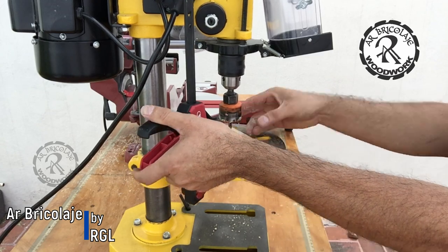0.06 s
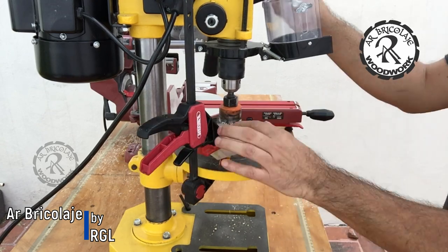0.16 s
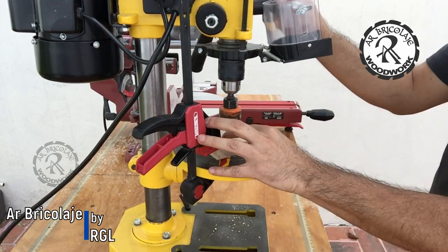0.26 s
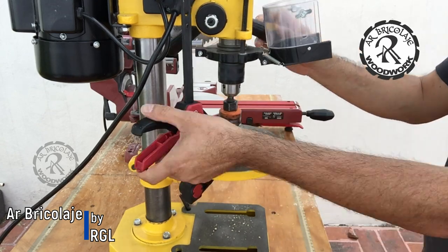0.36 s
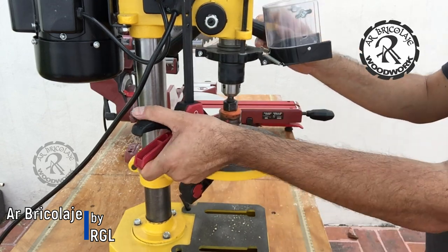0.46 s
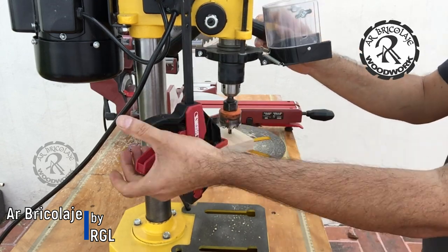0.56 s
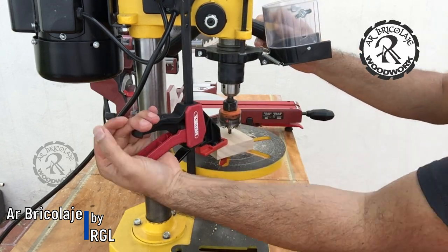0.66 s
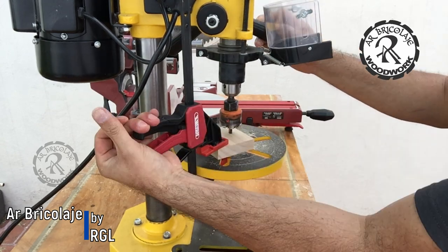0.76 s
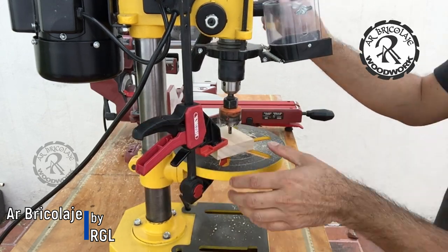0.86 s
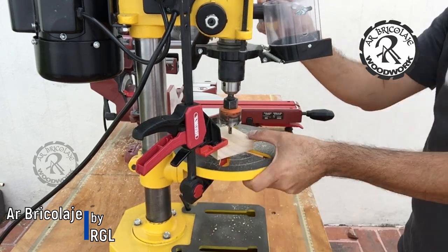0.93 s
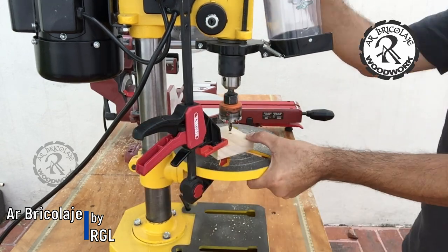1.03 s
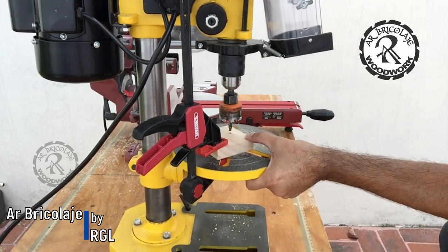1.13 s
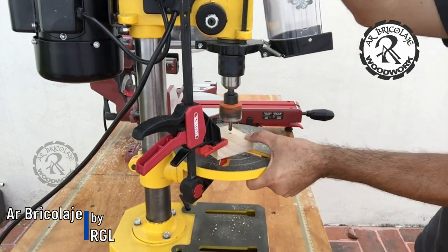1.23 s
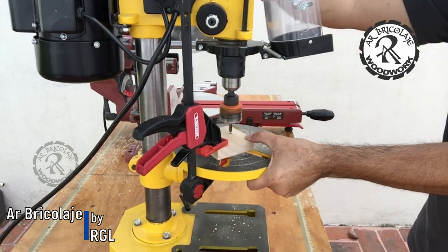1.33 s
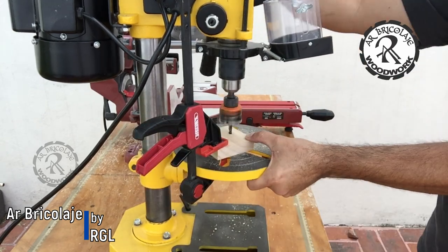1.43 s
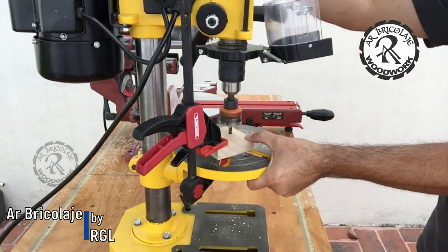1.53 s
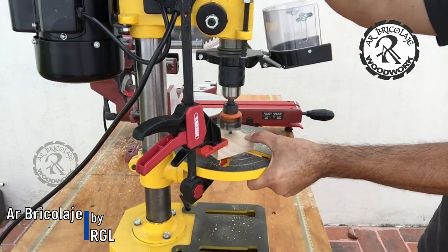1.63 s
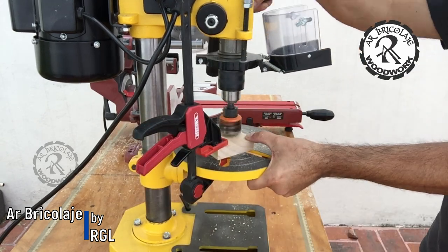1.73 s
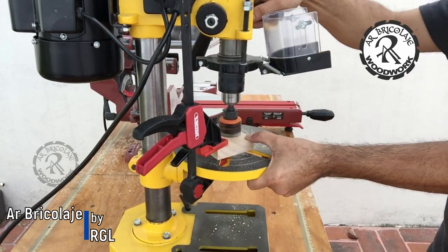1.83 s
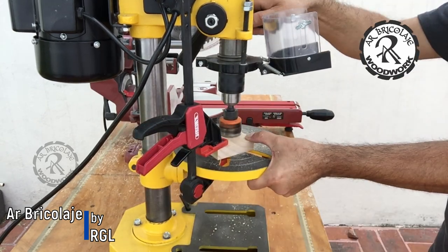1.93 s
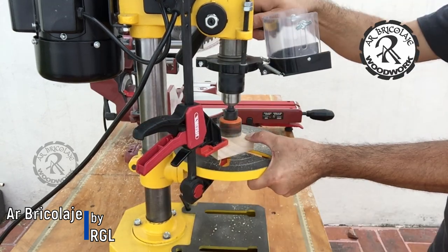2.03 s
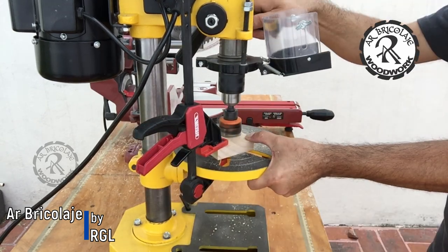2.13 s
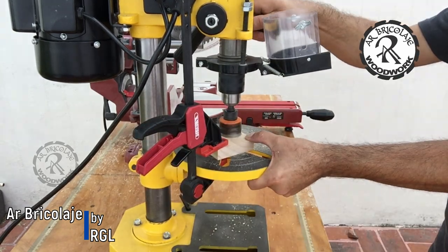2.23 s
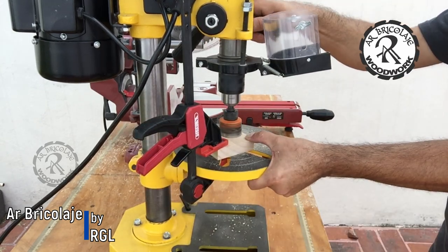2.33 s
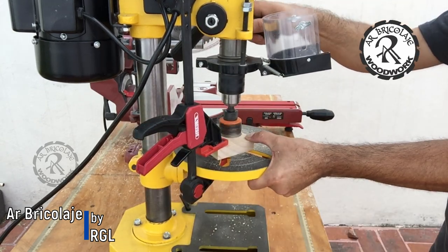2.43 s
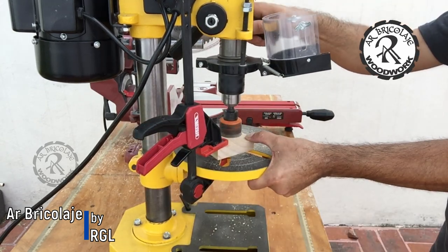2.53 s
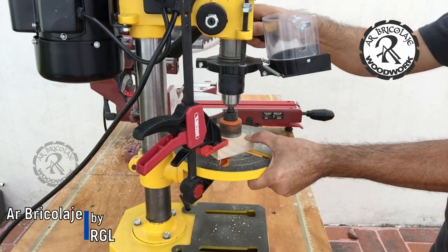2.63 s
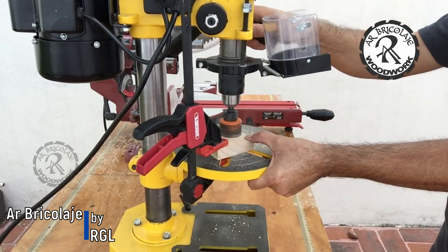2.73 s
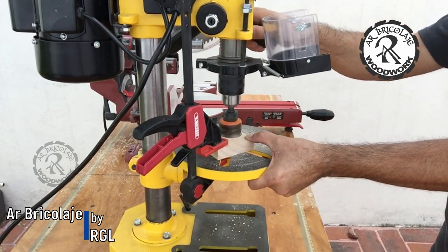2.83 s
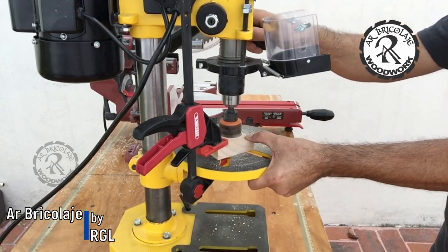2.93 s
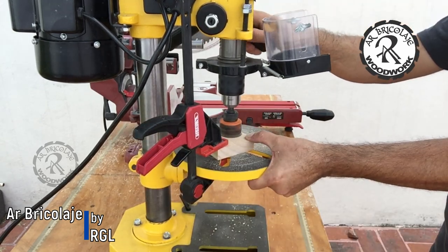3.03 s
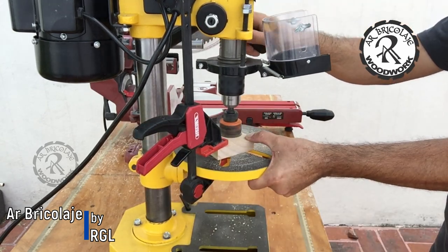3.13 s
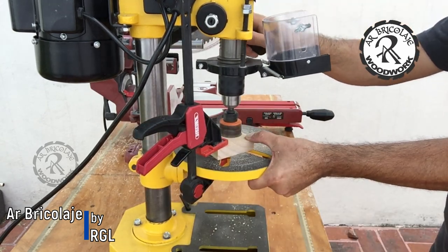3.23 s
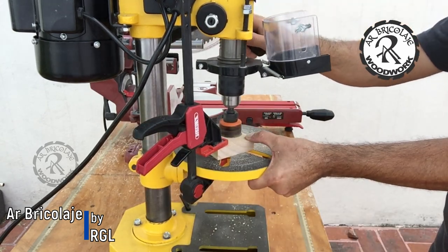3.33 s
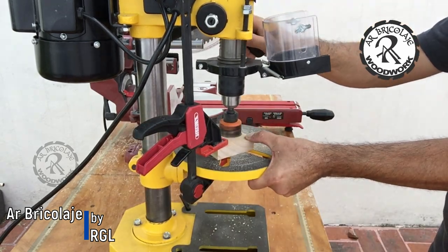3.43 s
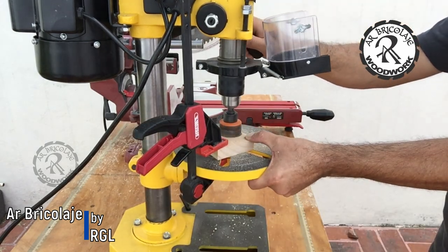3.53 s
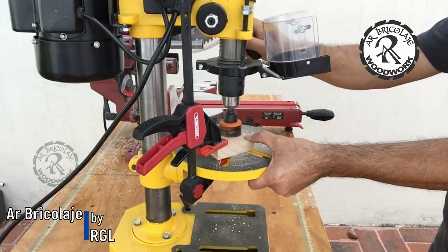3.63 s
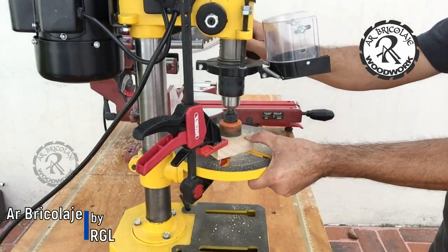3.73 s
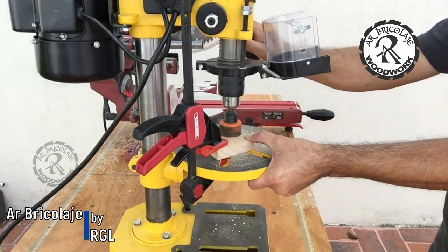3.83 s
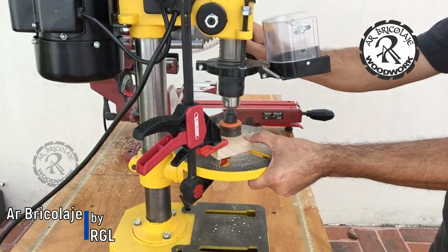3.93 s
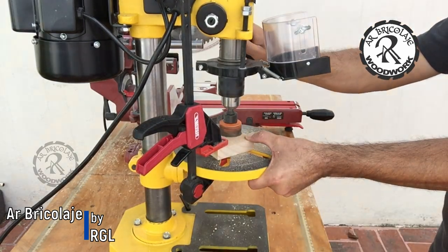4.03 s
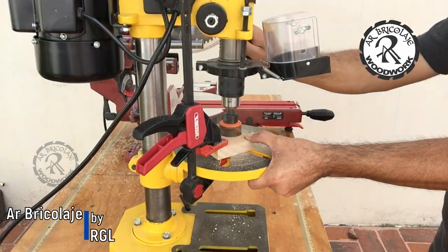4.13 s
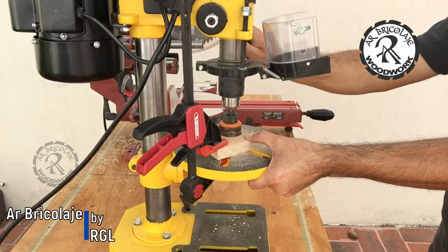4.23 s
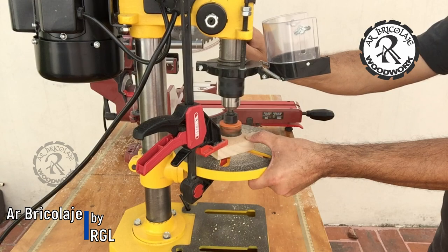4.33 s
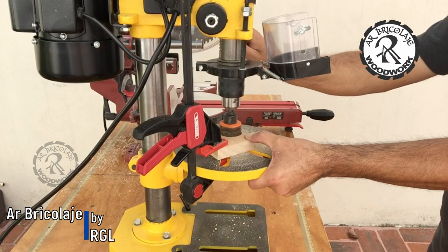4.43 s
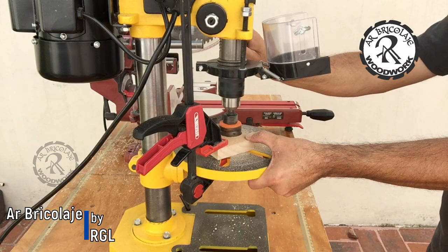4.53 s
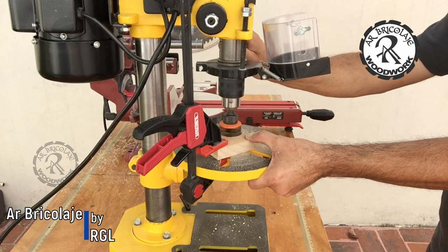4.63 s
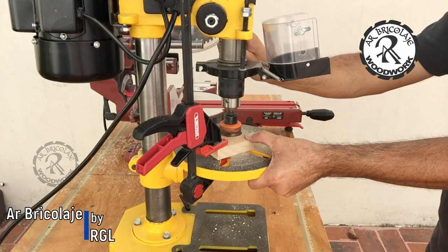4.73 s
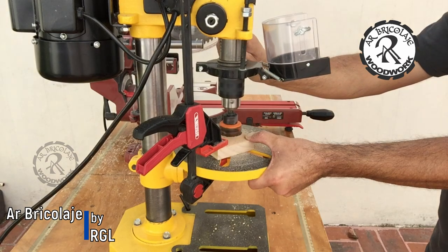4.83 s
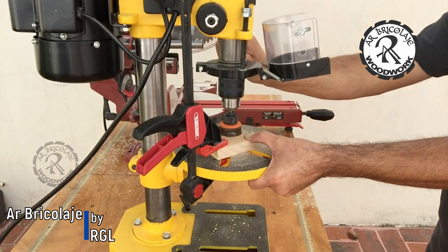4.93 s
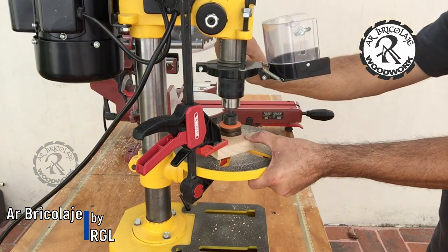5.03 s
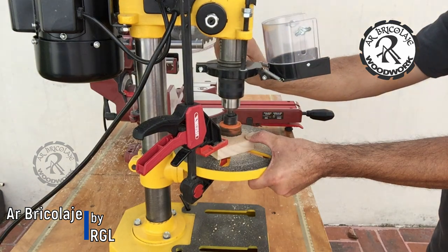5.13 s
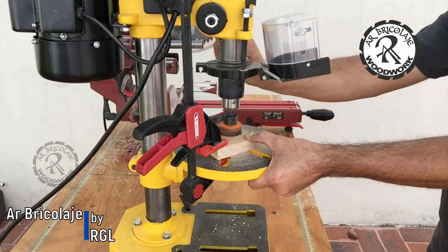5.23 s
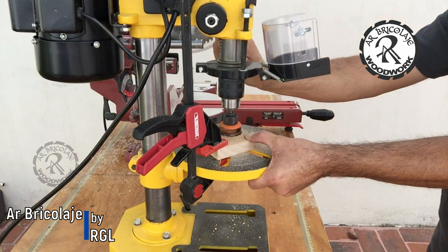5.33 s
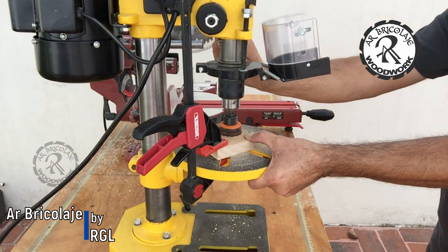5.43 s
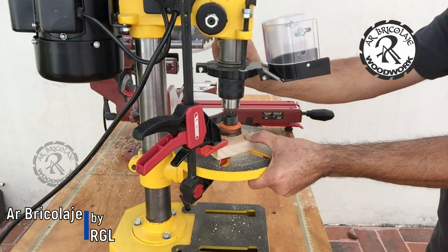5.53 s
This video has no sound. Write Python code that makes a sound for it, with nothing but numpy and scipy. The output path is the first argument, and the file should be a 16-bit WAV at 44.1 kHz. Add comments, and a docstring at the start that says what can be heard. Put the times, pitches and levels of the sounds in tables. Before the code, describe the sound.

A bench drill press whirs free with small clicks and squeaks, then its hole saw rasps into wood and settles into singing, grinding friction.

```python
"""A motor idles with a fan rush and a whine: a bench drill press, fast and high-pitched; clicks and faint squeaks.
Its hole saw then bites a clamped wooden block with a rough rasp, sinks into the kerf, slows, rubs and sings.
Rush, rasp and dust are shaped noise; friction rereads a wearing circular track, so it nearly repeats each turn.
Whine and singing are unsteady sines locked to the spindle angle; clicks are sums of decaying modes."""
import sys
import numpy as np
from scipy import signal
from scipy.fft import rfft, irfft, next_fast_len
from scipy.io import wavfile
from scipy.ndimage import uniform_filter1d, map_coordinates

SR = 44100
rng = np.random.default_rng(int(sys.argv[2]) if len(sys.argv) > 2 else 0)


def generate_wav(signal):
    """Clip the signal to [-1, 1] and save it as 16-bit WAV at the path in sys.argv[1]."""
    frames = np.transpose(np.atleast_2d(signal))
    scaled = np.clip(frames, -1, 1) * 32767
    pcm = np.round(scaled).astype(np.int16)
    wavfile.write(sys.argv[1], SR, pcm)


N = 246078

# Partials on which the cup sings. Each entry: multiple of the spindle speed.
SINGING_MULTIPLES = (7, 8, 12, 13, 14, 15, 16, 17, 18, 19, 20, 23, 24)


def amp(db):
    """Level law: decibels to amplitude gain."""
    return 10 ** (np.asarray(db) / 20)


def unit(x):
    """Power normalisation: scale to rms 1."""
    return x / np.sqrt(np.mean(x ** 2) + 1e-20)


def curves(rows):
    """Linear interpolation: one value per sample for each column after the time."""
    s, *columns = np.transpose(rows)
    return [np.interp(np.arange(N) / SR, s, column) for column in columns]


def ramp(start, length):
    """Linear onset: rises from 0 to 1 over length seconds."""
    return np.clip((np.arange(N) / SR - start) / length, 0, 1)


def swell(centre, length):
    """Gaussian envelope of height 1, down to exp(-2) at length seconds either side of its centre."""
    return np.exp(-2 * ((np.arange(N) / SR - centre) / length) ** 2)


def wobble(rate):
    """Slow random modulation: a smooth curve through random knots, rate of them a second."""
    coarse = np.linspace(0, N, 4096)
    knots = rng.standard_normal(int(N * rate / SR) + 4)
    smooth = map_coordinates(knots, [coarse * rate / SR])
    return np.interp(np.arange(N), coarse, smooth)


def noise():
    """White noise: equal power at every frequency."""
    return rng.standard_normal(N)


def filtered(x, response):
    """Linear filtering: the spectrum of x times a response of frequency."""
    m = next_fast_len(N + SR // 4)
    spectrum = rfft(x, m) * response(np.fft.rfftfreq(m, 1 / SR))
    return irfft(spectrum, m)[..., :N]


def coloured(x, spectrum):
    """Spectral shaping: x through a (Hz, relative dB) curve over log frequency, at rms 1."""
    f, db = np.transpose(spectrum)
    return unit(filtered(x, lambda hz: amp(np.interp(np.log(hz + 1), np.log(f), db))))


def partial(turns, order, flutter_db, drift, rate):
    """Order-locked tone of rms 1 at a multiple of rotation; drift is its phase wander in radians."""
    phase = 2 * np.pi * (order * turns + rng.random()) + drift * wobble(rate)
    return unit(amp(flutter_db * wobble(rate)) * np.sin(phase))


def groove(turns, memory, weight=lambda order: 1, size=1024):
    """Quasi-periodic roughness: a circular track met again every turn, worn away over `memory` turns."""
    order = np.arange(96)  # cycles per turn
    fresh = rng.standard_normal((int(turns[-1]) + 2, len(order), 2)) @ [1, 1j]
    keep = np.exp(-1 / memory)
    worn = signal.lfilter([1], [1, -keep], fresh, axis=0)
    track = irfft(worn * weight(order) * (order > 2), size).ravel()
    return unit(np.interp(turns * size, np.arange(len(track)), track))


def scrape(turns, memory, loose, weight=lambda order: 1):
    """Power-sharing mixture: friction on the groove, and a share of loose chips that never repeats."""
    loose = np.clip(loose, 0, 1)
    return np.sqrt(1 - loose) * groove(turns, memory, weight) + np.sqrt(loose) * noise()


def pressure(turns, swing_db, grain_db):
    """Runout modulation: the teeth press unevenly round each turn, and fibres break at random."""
    swing = sum(db * np.cos(2 * np.pi * (k + 1) * turns) for k, db in enumerate(swing_db))
    return unit(amp(swing + grain_db * wobble(330)))


def patchy(x, depth_db):
    """Independent band modulation: narrow bands of x swell and fade, neighbours partly together."""
    z = signal.stft(x, nperseg=512)[2]
    field = rng.standard_normal(z.shape)
    field = uniform_filter1d(field, size=4, axis=0)  # across frequency
    field = uniform_filter1d(field, size=30, axis=1)  # along time
    return unit(signal.istft(z * amp(depth_db * unit(field)), nperseg=512)[1][:N])


def resonance(hz, modes):
    """Resonant gain: powers of several modes added along a pitch curve."""
    grid = np.linspace(hz.min(), hz.max(), 128)
    power = sum(amp(db) ** 2 / (1 + ((grid - centre) / width) ** 2) ** 2 for centre, width, db in modes)
    return np.interp(hz, grid, np.sqrt(power))


def cup(x):
    """Structural resonance: the saw's steel cup lifts the sound around its modes; output at rms 1."""
    # Resonances of the steel cup. Each row: centre in Hz, width in Hz, lift in dB.
    cup_modes = [(2160, 100, 4), (3170, 260, 4), (4020, 57, 3.5), (4770, 130, 7.5), (5760, 320, 3.5),
                 (6470, 93, 6), (9080, 230, 2.5), (12080, 610, 1)]

    def lift(hz):
        return amp(sum(db / (1 + ((hz - centre) / width) ** 2) for centre, width, db in cup_modes))

    return unit(filtered(x, lift))


def lulls():
    """Gated noise: a gain of 1 that dips in brief lulls, for the hiss and not the tones."""
    # Brief lulls. Each row: time in seconds, nominal length in seconds, depth in dB.
    dips = [(.488, .024, 8), (.675, .019, 7), (.721, .017, 7), (.884, .017, 7), (.953, .018, 9),
            (1.162, .023, 9), (1.697, .017, 10), (2.486, .016, 10), (3.159, .017, 12), (3.289, .031, 23),
            (3.529, .018, 10), (4.135, .016, 13), (4.367, .016, 12), (4.436, .015, 9), (4.645, .015, 9),
            (5.387, .018, 12)]
    edge = 0.011 / 2  # s
    # each corner: side of the dip, shift outward in edges; a negative shift marks the floor
    shape = ((-0.84, 1.0), (-1.0, -2.1), (0.045, -2.5), (0.73, 0.81))
    corners = [(s + side * (length / 2 + out * edge), -db * (out < 0))
               for s, length, db in dips for side, out in shape]
    return amp(curves(corners)[0])


def motor(turns):
    """Broadband flow noise and order tones: fan rush, bearing hiss and a rough whine that follows the speed."""
    # Spectrum of the fan rush. Each row: frequency in Hz, relative density in dB per Hz.
    fan_spectrum = [(180, -80), (300, -72.5), (719, -17.5), (1140, -9), (1250, -5.5), (1650, -4.5),
                    (1970, -7), (2120, -3.5), (2370, -5.5), (3500, -16.5), (4550, -53.5), (7700, -120)]
    # Spectrum of the bearing hiss. Each row: frequency in Hz, relative density in dB per Hz.
    hiss_spectrum = [(1760, -27.5), (3000, -6), (3900, -7.5), (4940, -7), (6430, -9), (7180, -14.5),
                     (7480, -9), (10500, -10.5), (15700, -21.5)]
    # Whine partials, each swelling above a floor.
    # Each row: multiple of the spindle speed, swell in dB, its centre in seconds, its length in seconds.
    whine_partials = [(7, -71, .3, 1.2), (8, -62.5, .8, .45), (11, -70, .75, .7), (24, -71, .05, .25),
                      (24, -65.5, .62, .2), (32, -72, .5, .55), (40, -75, .1, .35), (56, -74, .15, .35)]
    fan_db, hiss_db, whine_floor_db = -54.5, -58.5, -80
    fan = amp(fan_db + 0.6 * wobble(7.8)) * coloured(noise() * amp(1.5 * wobble(120)), fan_spectrum)
    hiss = amp(hiss_db + 0.43 * wobble(5.8)) * coloured(noise(), hiss_spectrum)
    whine = np.zeros(N)
    for order, db, s, length in whine_partials:
        level = amp(whine_floor_db) + amp(db) * swell(s, length)
        whine += level * partial(turns, order, flutter_db=3, drift=.5, rate=35)
    lull = lulls()
    # the rush dips by half as many dB as the hiss
    return np.sqrt(lull) * fan + lull * hiss + whine


def hum():
    """Fixed-frequency tones: the motor hums on a few pitches independent of the spindle speed."""
    # Tones of the motor. Each row: frequency in Hz, level in dB.
    hum_tones = [(463, -96), (578, -106), (958.2, -71.5)]
    t = np.arange(N) / SR
    return sum(amp(db) * partial(t, hz, flutter_db=2.5, drift=0.13, rate=15) for hz, db in hum_tones)


def moan(turns):
    """Low-order rotation tones: belt and spindle groan softly in slow swells."""
    # Low moans. Each row: centre in seconds, length in seconds, multiple of the speed, level in dB.
    groans = [(3.79, 0.25, 4.44, -68.5), (3.05, .7, 6, -67.5)]
    return sum(amp(db) * swell(s, length) * partial(turns, order, flutter_db=2.0, drift=1.0, rate=20)
               for s, length, order, db in groans)


def brushes():
    """Sliding friction noise: a hand brushes over clamp and table with a soft, grainy hiss."""
    # Strokes of the hand. Each row: centre in seconds, length in seconds, level in dB.
    strokes = [(.808, .008, -61), (.85, .06, -61.5), (.92, .04, -63)]
    # Spectrum of the stroke. Each row: frequency in Hz, relative density in dB per Hz.
    stroke_spectrum = [(1500, -32), (3500, 2), (4800, 4), (7000, -9), (10000, 2), (14000, -4), (15700, -15)]
    level = sum(amp(db) * swell(s, length) for s, length, db in strokes)
    return level * coloured(noise() * amp(3 * wobble(280)), stroke_spectrum)


def knocks():
    """Damped low resonance: a dull, quickly dying thud of the hand on the table."""
    # Soft knock. Each row: start in seconds, frequency in Hz, level in dB, 60 dB decay time in seconds.
    thuds = [(0.983, 850, -55.5, 0.08)]
    out, t = np.zeros(N), np.arange(N) / SR
    for s, hz, db, t60 in thuds:
        band = [(hz / 10, -70), (hz / 2, -20), (hz, 0), (2 * hz, -10), (10 * hz, -60)]
        out += amp(db - 60 * np.abs(t - s) / t60) * (t > s) * coloured(noise(), band)
    return out


def chirps():
    """Frequency-modulated squeaks: short scratchy glides of handling, most of them rising in pitch."""
    # Faint squeaks. Each row: centre in seconds, pitch there in Hz, glide in Hz per second,
    # length in seconds, level in dB.
    squeaks = [(.384, 5300, -8000, .022, -60), (.412, 4210, 0, .018, -57.5), (.427, 6450, 3000, .021, -60),
               (.448, 4250, 0, .025, -58), (.485, 3600, 8000, .018, -61), (.483, 5350, 4000, .018, -57),
               (.5, 5680, 3000, .018, -56), (.575, 5970, 0, .015, -63), (.695, 5150, 10000, .024, -58),
               (.725, 5850, 5000, .022, -62), (.73, 6580, 2000, .016, -63), (.814, 4280, 3000, .018, -58),
               (.838, 4780, 9000, .017, -55.5), (.903, 4300, 10000, .028, -56),
               (.936, 5980, 8000, .026, -58.5), (.955, 4230, 1000, .02, -55.5), (.974, 4520, 0, .012, -61)]
    out, t = np.zeros(N), np.arange(N) / SR
    waver_hz = 95 * wobble(450)
    scratch = unit(amp(3.5 * wobble(300)))
    for s, hz, glide, length, db in squeaks:
        pitch = hz + glide * (t - s) + waver_hz
        out += amp(db) * swell(s, length) * np.sin(2 * np.pi * np.cumsum(pitch) / SR)
    return out * scratch


def clicks():
    """Modal impact: each contact rings short modes with a tiny crack; the small parts radiate no bass."""
    # Hard clicks at the machine. Each row: start in seconds, peak in dB ahead of the high-pass.
    contacts = [(0.253, -44), (.2985, -38), (0.3079, -20.5), (0.3113, -35), (0.3129, -33), (0.4052, -44),
                (0.594, -44), (.832, -45), (1.206, -36)]
    # Modes that ring. Each row: frequency in Hz, relative level in dB, 60 dB decay time in seconds.
    click_modes = [(2200, -19, .025), (2840, -2, .016), (3060, -3, .021), (3560, -10, .016),
                   (4060, -9, .015), (4830, -12, .018), (5630, -20, .01), (7960, -18, .008),
                   (11830, -24, .018), (14050, -25, .012)]
    out, t = np.zeros(N + SR), np.arange(SR // 10) / SR
    for s, db in contacts:
        ring = np.zeros(len(t))
        for hz, level, t60 in click_modes:
            decay = amp(level + rng.normal(0, 1) - 60 * t / t60)
            ring += decay * np.sin(2 * np.pi * (hz * t + rng.random()))
        crack = 0.13 * amp(-60 * t / 0.026) * rng.standard_normal(len(t))
        hit = (ring + crack) * (1 - np.exp(-t / 0.00039))  # soft onset
        out[round(s * SR):][:len(t)] += amp(db) * hit / np.abs(hit).max()
    no_bass = signal.butter(3, 1400, "highpass", fs=SR, output="sos")
    return signal.sosfilt(no_bass, out[:N])


def sizzle(turns):
    """Spatial periodicity: fine track marks pass at about seventy a turn, loudest while they are fresh."""
    entry_s, rise_s, wear_s = 1.988, 0.091, 0.46
    steady_db, entry_db = -52, 9.5
    wear = np.exp(-np.maximum(np.arange(N) / SR - entry_s, 0) / wear_s)
    level = ramp(entry_s - rise_s, rise_s) ** 2 * amp(steady_db + entry_db * wear)
    return level * groove(turns, memory=9.3, weight=lambda order: np.exp(-.5 * ((order - 71.3) / 2.4) ** 2))


def chatter(turns):
    """Periodic impact: pushed hard, the saw strikes every turn, every second one harder; the cup rings near 3 kHz."""
    # Level of the chatter. Each row: time in seconds, level in dB.
    chatter_level = [(1.3, -90), (1.45, -48), (1.53, -37.5), (1.59, -36.5), (1.63, -32.5), (1.67, -38),
                     (1.72, -38), (1.77, -36), (1.85, -41), (1.93, -41), (2.03, -52), (2.2, -110)]
    # Spectrum of the blows. Each row: frequency in Hz, relative density in dB per Hz.
    chatter_spectrum = [(1800, -45.5), (2100, -11.5), (2550, -11), (2800, 0), (3000, 0), (3200, -2),
                        (3500, -14.5), (4500, -40)]
    level_db, = curves(chatter_level)
    blows = amp(2.5 * np.cos(2 * np.pi * turns) + 1.8 * np.cos(np.pi * turns))
    ringing = coloured(scrape(turns, memory=1.2, loose=.75), chatter_spectrum)
    return amp(level_db) * unit(blows * ringing)


def bite(turns, split_hz=3600):
    """Amplitude-modulated tearing noise: a growl of the cup, a coarse rasp and chips, pulsing with each turn."""
    # Spectrum of tearing wood. Each row: frequency in Hz, relative density in dB per Hz.
    rasp_spectrum = [(350, -63), (600, -43), (869, -27), (933, -28), (1100, -27.5), (1190, -14),
                     (1500, -10), (1630, -21.5), (1710, -13), (2150, -5), (2580, -5), (2920, 0),
                     (3630, -6.5), (5940, -4), (7000, -26), (9100, -58.5), (15400, -120)]
    # Spectrum of the fizzing chips. Each row: frequency in Hz, relative density in dB per Hz.
    chips_spectrum = [(3820, -40), (6500, -10), (6920, -8.5), (7820, -0.5), (8670, -7), (9370, -3),
                      (10500, -7.5), (12400, -7.5), (13500, -7), (15700, -12.5)]
    # Partials of the bite. Each row: multiple of the speed, level in dB against the growl.
    bite_tones = [(6, -26), (7, -22), (8, -18), (10, -18), (11, -10), (12, -9), (14, -12), (15, -8),
                  (24, -12), (28.6, -14)]
    growl_db, rasp_db, chips_db = -40, -41, -45
    # one harder push on the lever swells growl and chips
    push = swell(1.617, 0.18)
    growl_gain = amp(growl_db + 1.8 * push)
    chips_gain = amp(chips_db + 4 * push)
    # the tones swell briefly while the growl dips
    tone_swell_gain = amp(4 * swell(1.695, .018))
    teeth = scrape(turns, memory=2.1, loose=0.58) * pressure(turns, swing_db=(1.7, 1.3), grain_db=0.8)
    tearing = cup(coloured(teeth, rasp_spectrum))
    growl = filtered(tearing, lambda hz: 1 / (1 + (hz / split_hz) ** 16))
    rasp = tearing - growl
    spray = noise() * pressure(turns, swing_db=(2.8, 2.2), grain_db=1.5)
    chips = cup(coloured(spray, chips_spectrum))
    tones = sum(amp(db) * partial(turns, order, flutter_db=2.5, drift=.8, rate=35) for order, db in bite_tones)
    lull = lulls()
    low = growl_gain * (np.sqrt(lull) * unit(growl) + tone_swell_gain * tones)
    high = amp(rasp_db) * unit(rasp) + chips_gain * chips
    return low + lull * high


def rings(turns):
    """Friction-driven resonance: scraping rings the cup's upper modes one after another as the contact shifts."""
    # Upper resonances. Each row: centre in seconds, length in seconds, frequency in Hz, width in Hz, level in dB.
    upper_modes = [(2.25, 0.84, 9360, 240, -51.5), (2.353, 0.35, 11320, 380, -52.5),
                   (2.358, 0.2, 15700, 349, -55.5), (2.652, 0.23, 6550, 220, -52),
                   (2.852, .3, 14400, 403, -48.5), (3.005, 0.18, 4810, 220, -50),
                   (3.199, 0.78, 8550, 280, -52.5), (3.28, 0.12, 13000, 810, -45.5),
                   (3.797, 0.53, 14400, 402, -47.5), (3.847, 0.54, 10700, 397, -54.5),
                   (3.893, 0.4, 5840, 502, -49.5), (4.349, 0.71, 8240, 496, -51.5),
                   (4.462, 0.39, 3880, 258, -50), (4.69, 0.42, 5770, 490, -55),
                   (4.507, 0.68, 12400, 556, -54), (5.444, 0.28, 3980, 258, -49),
                   (5.438, 0.33, 7960, 280, -54), (5.523, 0.25, 9240, 244, -52),
                   (5.552, 0.23, 13700, 605, -52)]
    friction, out = scrape(turns, memory=7.9, loose=0.093), np.zeros(N)
    for s, length, hz, width, db in upper_modes:
        band = signal.butter(2, [hz - width / 2, hz + width / 2], "bandpass", fs=SR, output="sos")
        out += amp(db) * swell(s, length) * unit(signal.sosfilt(band, friction))
    return np.sqrt(lulls()) * out


def rub(turns, overtones_db=-6.5):
    """Cyclic friction: deep in the kerf the cup rubs the same track every turn and grinds the dust."""
    # Spectrum of the rubbed wall. Each row: frequency in Hz, relative density in dB per Hz.
    kerf_spectrum = [(350, -73), (600, -49.5), (933, -40.5), (1160, -18.5), (1230, -9.5), (1350, -7.5),
                     (1410, -12), (1710, -13.5), (2980, 5.5), (3590, -8.5), (4020, -3), (5140, -11),
                     (5760, -4), (7000, -33.5), (9100, -53), (15400, -120)]
    # Spectrum of the dust's fizz. Each row: frequency in Hz, relative density in dB per Hz.
    dust_spectrum = [(3820, -37.5), (6500, -4.5), (7020, -9), (8200, 1.5), (8890, -6), (9540, -1.5),
                     (10100, -4.5), (11000, -1), (11600, -3.5), (12200, -2.5), (12800, 2), (13800, -5.5),
                     (15000, 1), (15700, -4)]
    # Weaker partials. Each row: multiple of the speed, relative level in dB.
    weak_partials = [(6, -22), (9, -16), (10, -21), (11, -17), (21, -16), (22, -15), (25, -16), (26, -15),
                     (26.5, -14), (27, -15), (30, -16), (31, -13), (32, -14), (33, -14), (36, -15)]
    rub_db = -43
    # dust fills the kerf, then is slowly muffled as the saw sinks
    empty_db, full_db, start_s, fill_s, sag_db_per_s = -49, -40.5, 2.14, 0.15, 0.76
    sunk_s = np.maximum(np.arange(N) / SR - start_s, 0)
    dust_db = empty_db + (full_db - empty_db) * ramp(start_s, fill_s) - sag_db_per_s * sunk_s
    feed_db = 0.36 * wobble(17)  # the hand on the feed lever is never quite steady

    def unlocked(order):
        """Mode locking: where the cup rings, friction locks to it and keeps little of its own."""
        singing = np.isin(order, SINGING_MULTIPLES)
        weak = np.isin(order, np.transpose(weak_partials)[0])
        return np.select([singing, weak], [.22, .45], 1)

    friction = scrape(turns, memory=6, loose=.1, weight=unlocked)
    wall_force = friction * pressure(turns, swing_db=(.7, .5, .9), grain_db=1.07)
    wall = cup(coloured(wall_force, kerf_spectrum))
    dust_force = scrape(turns, memory=5, loose=0.3) * pressure(turns, swing_db=(.9, .7, 1), grain_db=-0.2)
    dust = cup(coloured(dust_force, dust_spectrum))
    grinding = amp(rub_db) * patchy(wall, depth_db=1.0) + amp(dust_db) * patchy(dust, depth_db=2.0)
    overtones = sum(amp(db) * partial(turns, order, flutter_db=3.5, drift=.55, rate=11)
                    for order, db in weak_partials)
    return amp(feed_db) * (lulls() * grinding + amp(rub_db + overtones_db) * overtones)


def sing(turns, speed):
    """Stick-slip: the steel cup sings on multiples of the speed near its resonances; now and then one squeals."""
    # Strength of the singing. Each row: time in seconds, then low, middle and high levels in dB.
    sing_level = [(1.95, -50.5, -40, -49), (1.98, -55, -40, -57), (2.38, -55.5, -52, -48),
                  (3.11, -53.5, -42, -46), (3.73, -48, -44.5, -55), (3.79, -54.5, -46, -55.5),
                  (4.26, -56.5, -44, -50.5), (4.46, -81.5, -44, -49), (4.57, -60, -44.5, -51),
                  (5.1, -58, -43.5, -63.5), (5.37, -61, -39.5, -48), (5.58, -58, -40, -64)]
    # Low singing resonances. Each row: centre in Hz, width in Hz, relative level in dB.
    low_modes = [(1276, 36, -2), (1368, 28, 1), (1434, 17, -3.5)]
    # Middle singing resonances. Each row: centre in Hz, width in Hz, relative level in dB.
    middle_modes = [(2155, 43, -13), (2363, 91, -10), (2464, 15, -6.5), (2720, 58, -8.5), (2859, 49, -6.5),
                    (3053, 63, -2), (3224, 78, -5.5)]
    # High singing resonances. Each row: centre in Hz, width in Hz, relative level in dB.
    high_modes = [(3425, 25, -6.5), (3656, 42, -5.5), (4050, 87, -1.5), (4280, 66, -3), (4470, 35, 0)]
    # Squeals, where one partial swells.
    # Each row: centre in seconds, length in seconds, multiple of the speed, level in dB.
    squeals = [(2.03, .25, 12, -50), (1.94, .07, 15, -45), (2.08, .28, 11, -53), (2.08, .3, 8, -61),
               (2.42, .15, 13, -54), (2.38, .26, 16, -48.5), (2.55, .3, 24, -52), (2.55, .3, 20, -54),
               (2.72, .2, 17, -47.5), (3.14, .32, 15, -42), (3.2, .16, 16, -46), (3.2, .2, 24, -54),
               (3.45, .25, 12, -54), (3.66, .1, 23, -50), (3.96, .12, 17, -46), (4.15, .25, 23, -50),
               (4.27, .24, 17, -43), (4.76, .26, 15, -48), (4.92, .16, 18, -48), (5.2, .2, 16, -46),
               (5.26, .45, 15, -42.5)]
    groups = list(zip(amp(curves(sing_level)), (low_modes, middle_modes, high_modes)))
    out = np.zeros(N)
    for order in SINGING_MULTIPLES:
        steady = sum(level * resonance(order * speed, modes) for level, modes in groups)
        squeal = sum(amp(db) * swell(s, length) for s, length, multiple, db in squeals if multiple == order)
        # the main partials hold steady, the high ones are rough
        flutter_db, drift, rate = (1.4, .18, 30) if order < 19 else (2.2, .38, 55)
        out += np.hypot(steady, squeal) * partial(turns, order, flutter_db, drift, rate)
    return out


def scene():
    """Superposition: the saw touches the wood, and its rasp gives way to rubbing as it sinks; mono."""
    # Spindle speed running free. Each row: time in seconds, speed in turns per second.
    free_speed = [(0, 196), (.25, 195), (.45, 206), (.68, 207), (.78, 213), (.95, 214.5), (1.05, 203),
                  (1.25, 201.3), (1.77, 201.3)]
    # Spindle speed under the load of the cut. Each row: time in seconds, speed in turns per second.
    loaded_speed = [(1.85, 200.5), (2.18, 193.5), (2.4, 185.4), (2.82, 178.3), (3.09, 181.5), (3.17, 179.0),
                    (3.49, 178.2), (3.55, 176.4), (3.99, 176.8), (4.06, 174.0), (4.16, 180.2),
                    (4.32, 176.3), (4.62, 179.7), (4.7, 177.0), (5.28, 182.2), (5.32, 181.1), (5.37, 184.1),
                    (5.58, 185.6)]
    # How far the saw has sunk. Each row: time in seconds, share of rubbing in power from 0 to 1.
    sinking = [(1.8, 0), (1.9, .1), (1.98, .75), (2.25, .95), (2.4, 1)]
    speed, = curves([*free_speed, *loaded_speed])
    turns = np.cumsum(speed) / SR
    # a growing shudder, in turns, blurs the highest partials of the friction
    shaken = turns + .0021 * wobble(50) * ramp(1, 0.95)
    contact, = curves([(1.218, 0), (1.238, .25), (1.25, 1)])  # (s, gain)
    depth, = curves(sinking)
    in_kerf = rub(shaken) + rings(shaken) + sing(turns, speed) + moan(turns)
    saw = np.sqrt(1 - depth) * bite(turns) + chatter(turns) + np.sqrt(depth) * in_kerf
    cutting = contact * (saw + sizzle(shaken) + hum())  # the hum, too, is heard only from contact on
    handling = clicks() + knocks() + chirps() + lulls() * brushes()
    mono = motor(turns) + cutting + handling
    return np.array([mono, mono])


def record(dry, low_cut_hz=450, top_hz=15800):
    """Band limiting: a fourth-order slope removes the bass, and nothing passes from top_hz up."""
    return filtered(dry, lambda hz: (hz < top_hz) * hz ** 4 / np.sqrt(hz ** 8 + low_cut_hz ** 8))


dry = scene()
out = record(dry)
generate_wav(out)
```